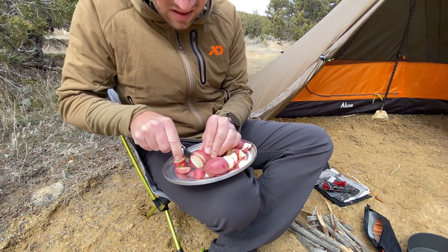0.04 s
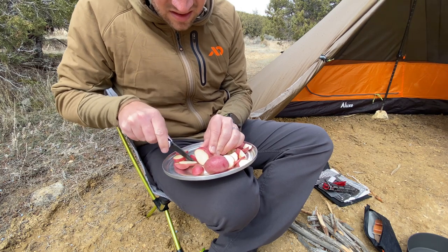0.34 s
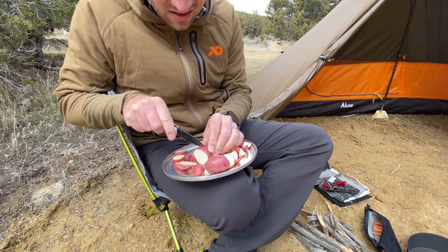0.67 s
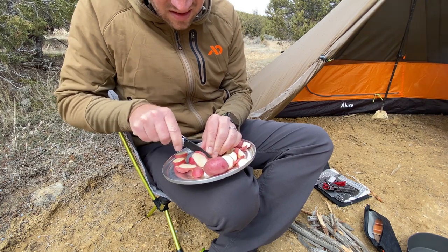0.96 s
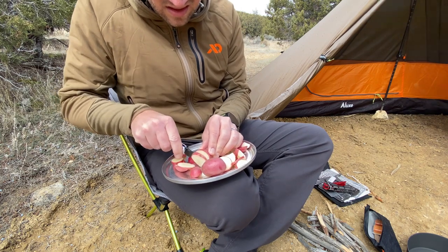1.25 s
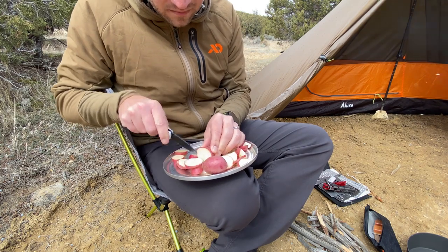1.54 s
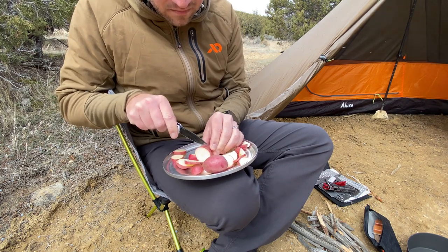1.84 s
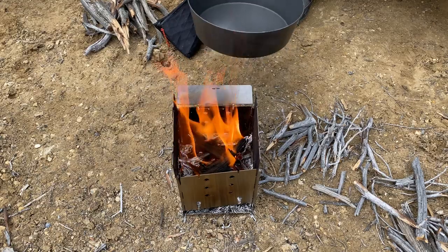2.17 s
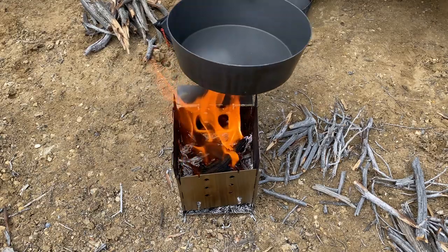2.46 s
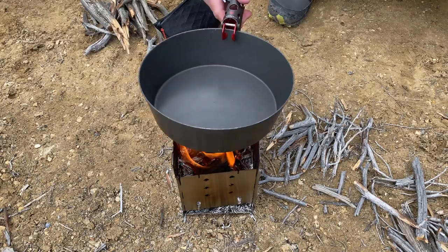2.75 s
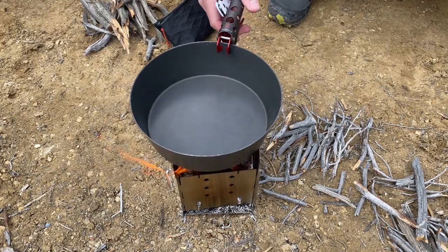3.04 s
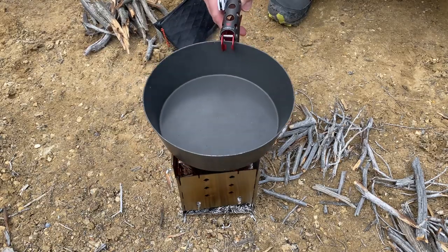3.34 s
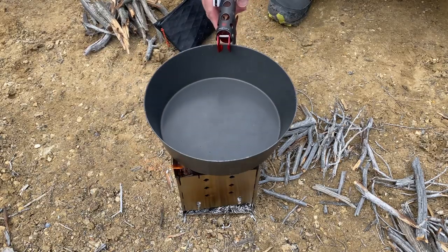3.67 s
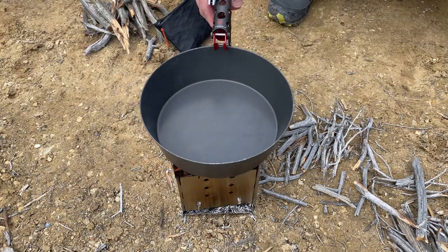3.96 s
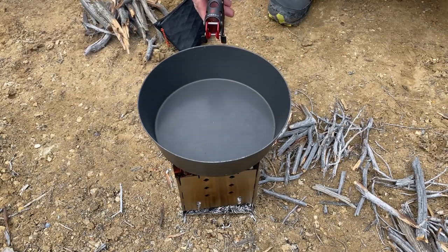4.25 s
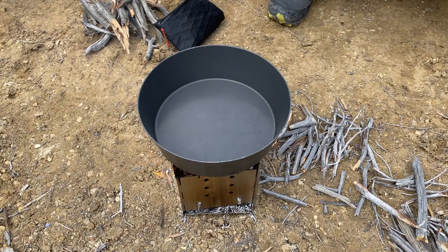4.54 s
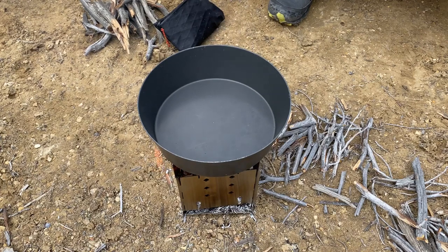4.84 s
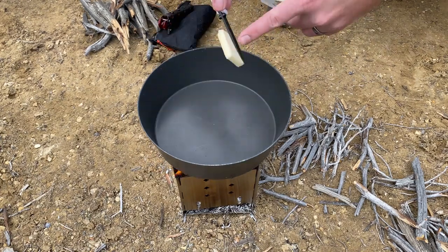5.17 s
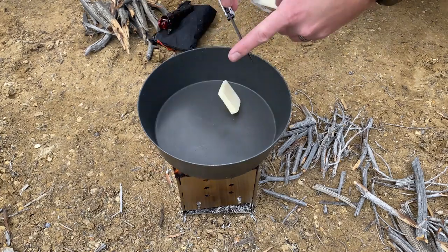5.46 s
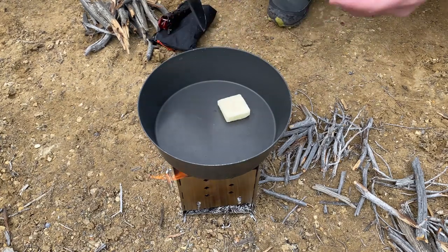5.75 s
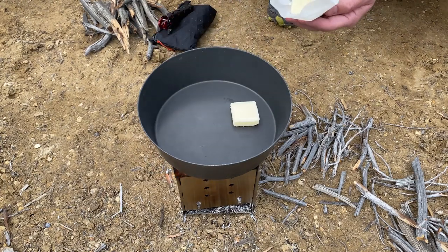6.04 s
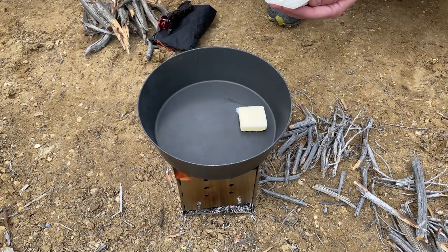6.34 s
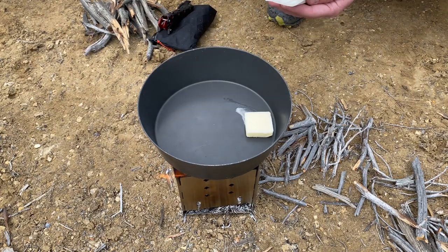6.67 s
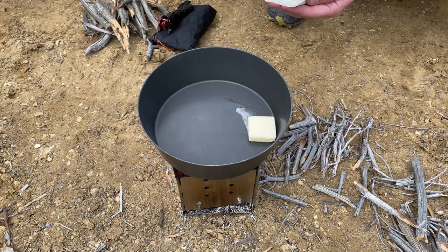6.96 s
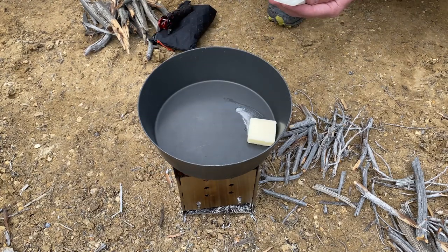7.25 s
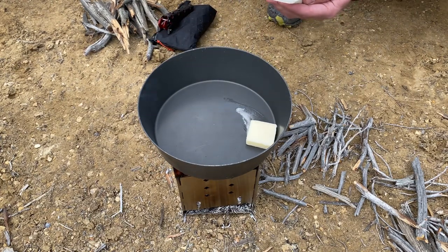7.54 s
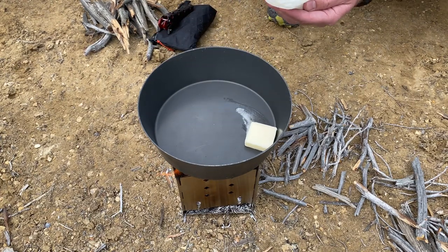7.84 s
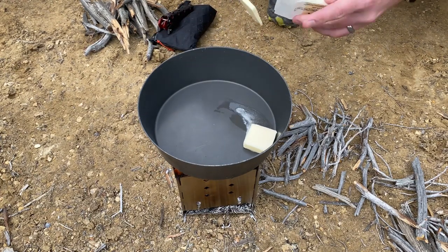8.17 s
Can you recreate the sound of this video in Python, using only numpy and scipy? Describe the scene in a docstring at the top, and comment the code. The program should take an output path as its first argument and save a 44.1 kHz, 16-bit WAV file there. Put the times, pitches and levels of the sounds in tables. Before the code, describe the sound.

Faint, moist potato slicing and two sharp knife clacks on a metal plate come first, heard nearby in still open air. Next a frying pan lands on a small metal stove with a loud, hollow clang, then wobbles and grinds into position. Small gripper clicks follow, and a piece of butter bumps into the pan. Soft gusts of wind rise at the end, with a barely audible wrapper crinkle and a snapping ember.

```python
"""A frying pan is set on a small wood stove: its base thumps, its wall rings, it scrapes and squeals
into place by stick-slip, and its gripper lets go and is folded. A wrapper rustles, butter drops into
the hot pan, embers snap and a breeze swells. A short scene at the same campsite comes first:
a knife bursts the cells of potatoes and twice clacks on a metal plate held on a lap."""
import sys
import numpy as np
from scipy import signal
from scipy.io import wavfile
from scipy.ndimage import uniform_filter1d

SR = 44100
rng = np.random.default_rng(int(sys.argv[2]) if len(sys.argv) > 2 else 0)


def wav_out(sig):
    """Save sig, one row per channel (or a flat mono array), as 16-bit PCM at SR to the path in sys.argv[1]."""
    wavfile.write(sys.argv[1], SR, np.round(np.clip(np.atleast_2d(sig).T, -1, 1) * 32767).astype(np.int16))


N = 370440
TIME_S = np.arange(N) / SR
RING_S = TIME_S[:SR // 2]
SCENE_CHANGE_S = 2.13  # plate to stove

# Pan base note, shifting as it rocks, sinking as it settles: time_s, pitch_hz
BASE_NOTE = [(3.03, 585), (3.07, 568), (3.24, 581.5), (3.37, 586), (3.45, 537), (3.54, 542), (3.9, 516)]
# Thin metal shaken by grit: freq_hz, level_db
GRIT_SPECTRUM = [(1500, 8), (2600, 0), (2900, 7), (3600, -10.5), (3900, 7), (4600, -5), (5600, 7.5),
                 (7200, -13.5), (8500, 6.5), (10000, -9.5), (16000, -11)]


def amp(db):
    """Decibels to gain."""
    return 10 ** (np.asarray(db) / 20)


def unit(x):
    """Scale to rms 1."""
    return x / np.sqrt(np.mean(x ** 2) + 1e-20)


def at_hz(points, hz):
    """Interpolate over log frequency."""
    f, value = np.transpose(points)
    return np.interp(np.log(hz + 1), np.log(f + 1), value)


def at_time(points, time_s):
    """Interpolate over time."""
    return np.interp(time_s, *np.transpose(points))


def add(mix, start_s, sound):
    """Mix a sound in at start_s."""
    part = mix[max(round(start_s * SR), 0):][:len(sound)]
    part += sound[:len(part)]


def colour(x, spectrum):
    """Minimum-phase filter of unit energy."""
    hz = abs(np.fft.fftfreq(4096, 1 / SR))
    log_gain = np.log(amp(at_hz(spectrum, hz)))
    response = np.exp(np.conj(signal.hilbert(log_gain)))
    taps = np.fft.ifft(response).real[:len(hz) // 2]
    return signal.oaconvolve(x, taps / np.linalg.norm(taps))[:len(x)]


def grains(rate_hz, spread_db):
    """Tiny random slips and fractures, a few large."""
    at = np.flatnonzero(rng.random(N) < rate_hz / SR)
    out = np.zeros(N)
    out[at] = rng.standard_normal(len(at)) * amp(spread_db * np.minimum(rng.exponential(1, len(at)), 4))
    return unit(out)


def wobble(depth_db, length_s):
    """Randomly wandering gain."""
    return amp(depth_db * unit(uniform_filter1d(rng.standard_normal(N), size=round(length_s * SR))))


def stroke(start_s, length_s, swell_db, attack_s, release_s, time_s=TIME_S):
    """Force of one push: builds, swells or eases, dies away."""
    t = time_s - start_s
    rise = np.clip(t / attack_s, 0, 1)
    release = np.exp(-np.clip((t - length_s) / release_s, 0, 20))
    return rise * amp(swell_db * np.clip(t / length_s, 0, 1)) * release


def swells(rows):
    """Bell-shaped gains from rows of peak_s, level_db, length_s."""
    return sum(amp(db) * np.exp(-2 * np.pi * ((TIME_S - peak_s) / length_s) ** 2)
               for peak_s, db, length_s in rows)


def ring(modes):
    """Decaying sines of alternating sign from rows of pitch_hz (value or curve), level_db, t60_s."""
    out = np.zeros(len(RING_S))
    for k, (hz, db, t60_s) in enumerate(modes):
        phase = 2 * np.pi * np.cumsum(np.broadcast_to(hz, RING_S.shape)) / SR
        out += (-1) ** k * amp(db) * np.exp(-np.log(1000) * RING_S / t60_s) * np.sin(phase)
    return out


def burst(spectrum, t60_curve):
    """Dry knock: noise decaying band by band."""
    hz, t, bands = signal.stft(rng.choice([-1., 1.], len(RING_S)), SR, nperseg=128)
    decay = np.exp(-np.log(1000) * t / at_hz(t60_curve, hz)[:, None])
    knock = signal.istft(bands * decay, SR)[1]
    return colour(knock[:len(RING_S)], spectrum)


def shimmer(spectrum, t60_curve, count=90):
    """Thin metal struck at a random spot: many modes, crowding towards the bass."""
    jitter, phase, size = rng.random((3, count, 1))
    hz = 330 + 15700 * ((np.arange(count)[:, None] + jitter) / count) ** 1.4
    t = RING_S[:len(RING_S) // 5]
    weight = (.25 + size ** 2) * (hz / hz.mean()) ** .15 * np.sqrt(5 / count)
    modes = np.exp(-np.log(1000) / at_hz(t60_curve, hz) * t) * np.sin(2 * np.pi * (hz * t + phase))
    return colour(np.pad((weight * modes).sum(0), (0, len(RING_S) - len(t))), spectrum)


def resonate(x, hz, width_hz):
    """Resonance following the curve hz."""
    turn = np.exp(2j * np.pi * np.cumsum(hz) / SR)
    pole = np.exp(-np.pi * width_hz / SR)
    return (turn * signal.lfilter([1 - pole], [1, -pole], x / turn)).real


def slicing(fizz_db=-47, firm_cut_db=-47, fizz_exponent=1.8):
    """Cells burst unevenly along the blade; juice fizz grows faster with force than the rasp."""
    # Blade strokes: start_s, length_s, attack_s, level_db, swell_db
    cuts = [(0, 0.028, 0.0021, -51.5, -4), (0.093, 0.088, 0.031, -54, 4.5), (0.19, 0.268, 0.075, -48, -11),
            (0.943, 0.187, 0.002, -60, 2), (1.243, 0.047, 0.004, -50, 8.5),
            (1.302, 0.065, .01, -53.5, -11.5), (1.375, 0.13, 0.05, -43.5, -14),
            (1.505, 0.096, 0.0085, -64, 10.5)]
    # Blade rasp: freq_hz, level_db
    rasp_spectrum = [(300, -16.5), (700, -7), (950, -23.5), (1280, -14), (1500, 0.5), (1980, -2),
                     (2350, -7), (2850, 1), (3330, -15), (3650, -6), (4600, -9.5), (5200, -19), (9000, -43)]
    # Juice fizz: freq_hz, level_db
    fizz_spectrum = [(2500, -22), (6300, -8), (7600, 3.5), (8300, -1.5), (9000, 1), (10200, -9.5),
                     (13000, -8.5), (16000, -16.5)]
    force = sum(amp(db) * stroke(start_s, length_s, swell_db, attack_s, release_s=.004)
                for start_s, length_s, attack_s, db, swell_db in cuts)
    force *= wobble(depth_db=1.2, length_s=.012)
    rasp = unit(colour(grains(rate_hz=5000, spread_db=2.8), rasp_spectrum))
    fizz = unit(colour(grains(rate_hz=7000, spread_db=2.5), fizz_spectrum))
    return force * rasp + amp(fizz_db) * (force / amp(firm_cut_db)) ** fizz_exponent * fizz


def plate_clacks(knock_t60_s=.014, ring_db=4):
    """The blade lands on a plate damped by lap and food."""
    # Landings, hard or light: start_s, level_db, bump_db
    landings = [(0.1644, -15, -67.5), (1.193, -67.5, -80), (1.2868, -9, -50)]
    # Plate modes: pitch_hz, level_db, t60_s
    plate_modes = [(720, -9, 0.025), (1497.4, -3.5, 0.015), (1946.4, 1, 0.021), (2350, -9, .022),
                   (2767, 3, 0.014), (3750, 3, 0.0069), (5800, -8, 0.011), (6100, -20, 0.034),
                   (8620, -6, .014)]
    # Dry knock: freq_hz, level_db
    knock_spectrum = [(150, -32), (340, -27), (580, -6), (1100, -6), (2000, -4), (4000, -6.5), (5000, -9),
                      (7200, -19), (8700, -6), (10000, -13.5), (16000, -29)]
    # Dull bump on the lap: freq_hz, level_db
    lap_spectrum = [(40, -3), (130, -0.5), (330, -22), (1000, -60)]
    bump = colour(signal.unit_impulse(len(RING_S)), lap_spectrum)
    bump /= bump.max()
    out = np.zeros(N)
    for start_s, db, bump_db in landings:
        clack = burst(knock_spectrum, [(1, knock_t60_s)]) + amp(ring_db) * ring(plate_modes)
        add(out, start_s, amp(db) * clack + amp(bump_db) * bump)
    return out


def air(camp_db=-64.5, stove_db=-63.5, calm_db=-79, draught_db=-56.5, pickup_s=5.24, rise_s=.22):
    """Still air at each place; at the stove a fluttering breeze, hollow in the strongest gusts."""
    # Air at the plate: freq_hz, level_db
    camp_spectrum = [(20, 4.5), (130, -7.5), (280, -17), (700, -23.5), (3000, -36.5), (11000, -40),
                     (16000, -56.5)]
    # Air at the stove: freq_hz, level_db
    stove_spectrum = [(20, 0), (150, -0.5), (300, -11.5), (580, -7), (850, -19), (2000, -30), (8700, -38),
                      (16000, -42.5)]
    # Dull roar of the breeze: freq_hz, level_db
    roar_spectrum = [(20, -18), (90, 4), (200, -5.5), (360, 0.5), (600, -5), (850, -8), (1200, -14),
                     (1550, -26.5), (3000, -81)]
    # Gusts: peak_s, level_db, length_s
    gusts = [(5.52, -60.5, 0.59), (6.76, -51.5, 0.71), (7.22, -50, 0.33), (7.58, -52, 0.44)]
    camp, stove, roar, vortex = rng.standard_normal((4, N))
    at_stove = np.clip((TIME_S - SCENE_CHANGE_S) / .02, 0, 1)
    still = (1 - at_stove) * amp(camp_db) * unit(colour(camp, camp_spectrum))
    still += at_stove * amp(stove_db) * unit(colour(stove, stove_spectrum))
    pickup = (1 + np.tanh((TIME_S - pickup_s) / rise_s)) / 2
    wind = at_stove * (amp(calm_db) + amp(draught_db) * pickup + swells(gusts))
    flutter = unit(colour(roar, roar_spectrum) * wobble(depth_db=1, length_s=.0567))
    hollow_filter = signal.iirpeak(330, Q=330 / 130, fs=SR)
    hollow = unit(signal.lfilter(*hollow_filter, colour(vortex, roar_spectrum)))
    return still + wind * (flutter + wind / wind.max() * hollow)


def wind_buffet(level_db=-54, corner_hz=9):
    """Wind on the microphone at the plate: deep, slow heaving."""
    at_plate = np.clip((SCENE_CHANGE_S - TIME_S) / .1, 0, 1)
    lowpass = signal.butter(2, corner_hz, fs=SR, output="sos")
    return amp(level_db) * at_plate * unit(signal.sosfilt(lowpass, rng.standard_normal(N)))


def crackles(handling_t60_s=.029, focus_db=6):
    """Ringing rattle of the metal gripper being folded, then wrapper rustles; single dry snaps."""
    # Potato skin, gripper, wrapper, embers: start_s, level_db, t60_s, centre_hz
    snaps = [(1.333, -47, 0.021, 8000), (1.342, -35.5, 0.0085, 9200), (4.3638, -40.5, 0.05, 9700),
             (4.6009, -45.5, 0.03, 5700), (4.6466, -35.5, 0.024, 5800), (4.7613, -36, 0.026, 5910),
             (4.9039, -54, 0.033, 5970), (5.3256, -47, 0.015, 5040), (5.3817, -54.5, .015, 1090),
             (7.511, -41, 0.015, 2000), (7.7263, -60, 0.014, 1790), (7.8152, -61, .016, 2800),
             (7.8623, -58.5, 0.018, 3500), (7.9948, -49, 0.019, 2365)]
    # Gripper and wrapper handling: peak_s, level_db, length_s
    handling = [(4.693, -47.5, 0.04), (4.74, -44.5, 0.031), (4.942, -53, 0.038), (5.089, -62.5, 0.043),
                (5.17, -63, 0.045), (6.03, -73, 0.23), (7.678, -72.5, 0.073), (7.925, -72, 0.23)]
    # Handling and snaps: freq_hz, level_db
    crackle_spectrum = [(500, -22.5), (1500, -9), (2600, -7), (3700, -4.5), (5200, -6.5), (7000, -9.5),
                        (8300, -1), (10000, -14), (16000, -17)]
    slips = grains(rate_hz=1500, spread_db=3.2)
    handling_ring = burst(crackle_spectrum, [(1, handling_t60_s)])
    out = swells(handling) * unit(signal.oaconvolve(slips, handling_ring)[:N])
    for start_s, db, t60_s, centre_hz in snaps:
        spectrum = [(hz, band_db - focus_db * np.log2(hz / centre_hz) ** 2 / 2)
                    for hz, band_db in crackle_spectrum]
        add(out, start_s, amp(db) * burst(spectrum, [(1, t60_s)]))
    return out


def pan_wall(start_s, tilt_db_per_oct=0, favoured_hz=None, favour_db=5.5, favour_oct=.15):
    """Wall modes sink as the metal heats; each blow lands elsewhere and reweights them."""
    # Wall modes: cold_hz, hot_hz, cold_db, hot_db, t60_s
    wall_modes = [(1046, 915, 2, -13, .2), (1622, 1490, -2, -7, .16), (2050, 2030, -6, -5, .15),
                  (2369, 2270, -6, -14, .16), (2946, 2762, -2, -1, .15), (3230, 3079, -10, -22, .13),
                  (3885, 3640, -3, -1, .11), (5053, 4850, -6, -14, .085), (5598, 5280, -9, -17, .09),
                  (6263, 6100, -1, -19, .055), (6745, 6621, -4, -15, .06), (7965, 7693, -6, -10, .06)]
    # Leaning on the stove stiffens the wall, lifting the lowest mode most: time_s, rise_hz
    lean = [(3.03, -3), (3.08, 28), (3.15, 19), (3.24, 69), (3.3, 15), (3.38, 52), (3.58, 6.5)]
    cold_hz, hot_hz, cold_db, hot_db, t60_s = np.transpose(wall_modes)
    heat = np.interp(start_s, [3.1, 4.4, 5.6], [0, .3, 1])
    hz = cold_hz + heat * (hot_hz - cold_hz)
    db = cold_db + heat * (hot_db - cold_db)
    db += tilt_db_per_oct * np.log2(hz / np.median(hz)) + rng.standard_normal(len(hz))
    if favoured_hz:
        db += favour_db * np.exp(-(np.log2(hz / favoured_hz) / favour_oct) ** 2)
    if 4.38 < start_s < 5.5:  # free of the gripper and empty: low modes linger
        t60_s = t60_s * (1 + (hz[0] / hz) ** 2)
    rise_hz = at_time(lean, start_s + RING_S)
    bent_hz = [f + rise_hz * (hz[0] / f) ** .34 for f in hz]
    return ring(zip(bent_hz, db, t60_s))


def pan_blows(contact_s=.0004, spread_s=.0012, base_t60_s=.081, flex_t60_s=.07, leak_hz=340):
    """The base thumps like a drum, pan and stove clang, and the ring spreads to the wall."""
    # Stove, then knife and butter: start_s, thump_db, clang_db, tilt_db_per_oct, wall_db, favoured_hz
    blows = [(2.9818, -2, -11.5, -1.5, -31.5, 1625), (3.0007, -3.5, -13.5, 1.5, -24.5, 2950),
             (3.0593, -21, -30, -6, -56, 1050), (3.1404, -12, -17.5, -1.5, -63, 2950),
             (3.155, -22.5, -27.5, 0, -31.5, 2050), (3.2357, -22, -37, -2.5, -45.5, 2060),
             (3.2874, -9, -26.5, 0.5, -33.5, 1625), (3.335, -22.5, -35, 4, -49, 2950),
             (3.4188, -18.5, -31.5, -2, -40.5, 2070), (3.582, -28, -39.5, -1, -49.5, 2950),
             (4.0125, -24, -25, -4, -48.5, 2950), (4.2203, -36.5, -36, -4.5, -58.5, 1610),
             (4.386, -35, -37.5, -5.5, -59.5, 2076), (5.607, -13.5, -28.5, -8, -63, 2030),
             (5.615, -36, -24.5, -4, -61, 2030), (5.6276, -9, -27.5, 0.5, -38, 2760),
             (5.640, -22, -26, -2.5, -32, 2030), (5.6862, -23.5, -29.5, -6.5, -48, 2760),
             (5.7337, -13, -27.5, -8, -52, 2760), (5.7404, -19.5, -27, -2, -35.5, 3640),
             (5.783, -29.5, -28, -8.5, -73, 2030)]
    # Dense ring of pan and stove: freq_hz, level_db
    clang_spectrum = [(60, -24.5), (220, -31), (330, -14.5), (450, 10), (600, 3), (720, -10), (1000, 0),
                      (1500, 0), (2150, -5), (2650, -12.5), (3900, -9.5), (4600, -16), (5500, -12),
                      (8700, -13.5), (10000, -23.5), (16000, -24.5)]
    # Its decay: freq_hz, t60_s
    clang_decay = [(100, 0.033), (500, 0.026), (1500, 0.069), (4000, 0.077), (9000, 0.05), (16000, 0.047)]
    # Light taps on the hot pan: start_s, level_db
    taps = [(4.369, -56), (6.5685, -54)]
    out = np.zeros(N)
    contact = 1 - np.exp(-RING_S / contact_s)
    spread = 1 - np.exp(-RING_S / spread_s)
    leak = signal.butter(2, leak_hz, "high", fs=SR)  # bass slips round the open pan
    for start_s, thump_db, clang_db, tilt, wall_db, favoured_hz in blows:
        hz = at_time(BASE_NOTE, start_s + RING_S)
        base = ring([(hz, 0, base_t60_s)]) + ring([(.92 * hz, -14, flex_t60_s)])
        thump = signal.lfilter(*leak, contact * base)
        clang = shimmer([(f, db + tilt * np.log2(f)) for f, db in clang_spectrum], clang_decay)
        wall = pan_wall(start_s, .93 * tilt, favoured_hz) * spread
        add(out, start_s, amp(thump_db) * thump + amp(clang_db) * clang + amp(wall_db) * wall)
    for start_s, db in taps:
        ping = colour(pan_wall(start_s), [(1500, -73), (3600, -9), (8500, -3.5)])
        add(out, start_s, amp(db) * ping)
    return out


def scrape(metal_t60_s=.059, wall_db=-8, edges=3):
    """Stick-slip on the stove's edges keeps base, thin metal and wall ringing."""
    # Shoves of the pan: start_s, length_s, drag_db, grit_db, swell_db
    shoves = [(3.017, 0.2, -52.5, -59, 9.5), (3.212, 0.088, -48, -46.5, 11), (3.272, 0.08, -42, -51, -25),
              (3.394, 0.14, -33, -40, -9), (3.656, .14, -52.5, -59, -2.5), (3.802, 0.16, -39.5, -51.5, -5),
              (4.014, 0.21, -49, -65, 3)]
    # Dragged base: freq_hz, level_db
    drag_spectrum = [(150, -32), (450, -7.5), (535, 8), (610, -10), (700, -17), (880, -3), (1100, -14.5),
                     (1600, -19), (2000, -31.5), (3500, -52)]
    catches = wobble(depth_db=2.8, length_s=.012)
    slips = catches * grains(rate_hz=2500, spread_db=2.8)
    metal = np.zeros(N)
    for _ in range(edges):  # the load wanders between edges, each with its own modes
        load = wobble(depth_db=5, length_s=.059)
        edge_slips = catches * load * grains(rate_hz=420, spread_db=2.7)
        metal += signal.oaconvolve(edge_slips, shimmer(GRIT_SPECTRUM, [(1, metal_t60_s)]))[:N]
    wall = signal.oaconvolve(np.diff(slips), pan_wall(start_s=3.6))[:N]
    grit = unit(metal) + amp(wall_db) * unit(wall)
    drag = unit(colour(slips, drag_spectrum))
    out = np.zeros(N)
    for start_s, length_s, drag_db, grit_db, swell_db in shoves:
        force = stroke(start_s, length_s, swell_db, attack_s=.038, release_s=.036)
        out += force * (amp(drag_db) * drag + amp(grit_db) * grit)
    return out


def skids(attack_s=.0095, release_s=.0097):
    """Slips lock on to one resonance of the stove or of the pan's base."""
    # Stove walls, gliding as the contact travels: start_s, length_s, first_hz, last_hz, level_db
    squeals = [(3.231, .11, 3410, 3380, -47), (3.321, 0.066, 2640, 2510, -53),
               (3.333, 0.11, 5550, 5380, -63), (3.417, 0.078, 3300, 3240, -56.5)]
    # Base, as the rim skids over the stove's edge: start_s, length_s, level_db
    drones = [(3.337, 0.07, -40), (3.435, 0.041, -34)]
    out = np.zeros(N)
    for start_s, length_s, first_hz, last_hz, db in squeals:
        hz = np.interp(RING_S, [0, length_s], [first_hz, last_hz])
        tone = unit(resonate(rng.standard_normal(len(RING_S)), hz, width_hz=45))
        add(out, start_s, amp(db) * tone * stroke(0, length_s, 0, attack_s, release_s, RING_S))
    for start_s, length_s, db in drones:
        hz = at_time(BASE_NOTE, start_s + RING_S)
        tone = resonate(rng.standard_normal(len(RING_S)), hz, width_hz=12)
        tone /= np.std(tone[RING_S < length_s])
        add(out, start_s, amp(db) * tone * stroke(0, length_s, 0, attack_s, release_s, RING_S))
    return out


def burr_ticks(t60_s=.044):
    """A burr lets go and the thin metal rings briefly, brighter than the scrape."""
    # Snags: start_s, level_db
    snags = [(3.274, -37), (3.3075, -37), (3.3185, -40), (3.336, -41), (3.8967, -49.5), (3.9922, -42.5),
             (4.056, -45), (4.1973, -44), (4.208, -47.5)]
    out = np.zeros(N)
    for start_s, db in snags:
        add(out, start_s, amp(db) * np.diff(shimmer(GRIT_SPECTRUM, [(1, t60_s)])))
    return out


def scene():
    """All sources in the open air, mono."""
    mix = slicing() + plate_clacks() + air() + wind_buffet() + crackles()
    mix += pan_blows() + scrape() + skids() + burr_ticks()
    return mix[None]


def record(dry, ceiling=.74, cutoff_hz=16300):
    """Soft peak limit, then lowpass."""
    limited = dry / (1 + (dry / ceiling) ** 4) ** (1 / 4)
    lowpass = signal.firwin(511, cutoff_hz, window=("kaiser", 9), fs=SR)
    return signal.oaconvolve(limited, lowpass[None], "same")


dry = scene()
out = record(dry)
wav_out(out)
```